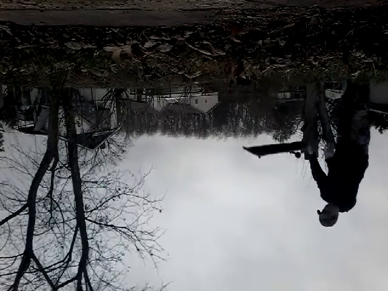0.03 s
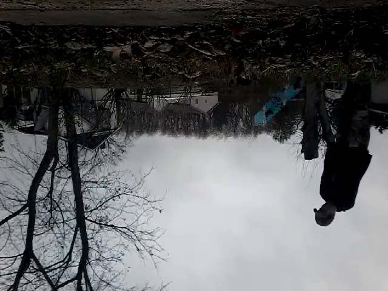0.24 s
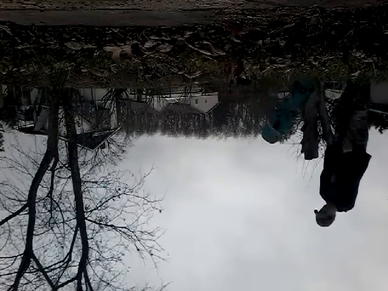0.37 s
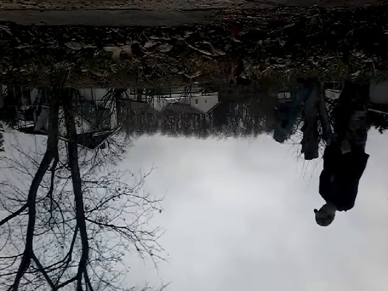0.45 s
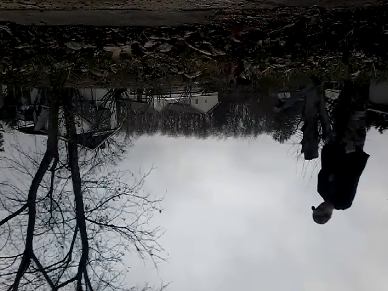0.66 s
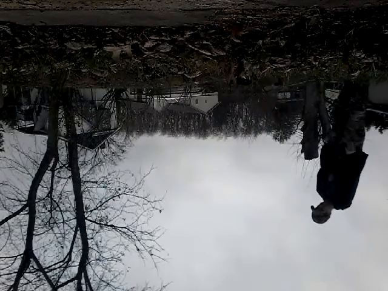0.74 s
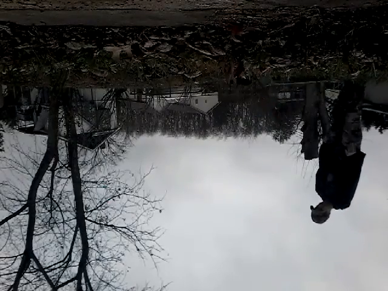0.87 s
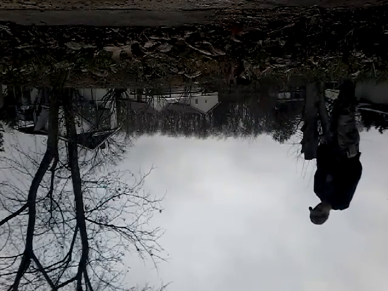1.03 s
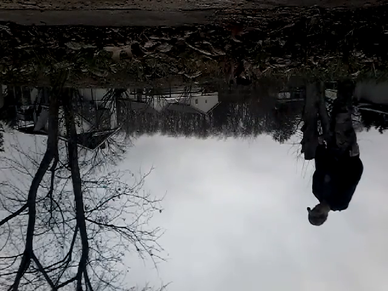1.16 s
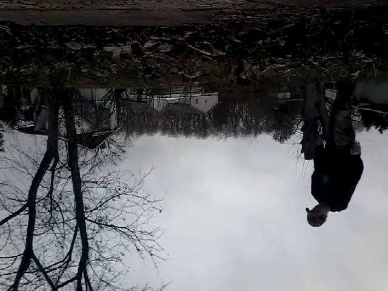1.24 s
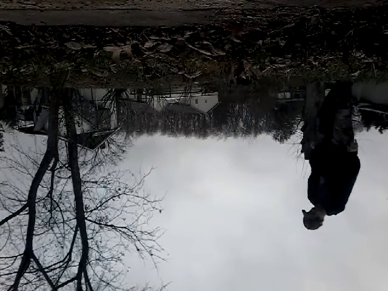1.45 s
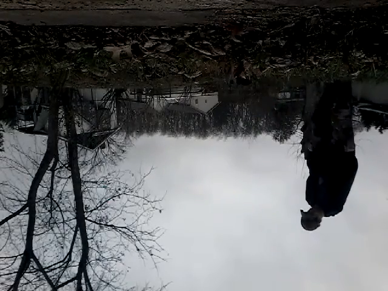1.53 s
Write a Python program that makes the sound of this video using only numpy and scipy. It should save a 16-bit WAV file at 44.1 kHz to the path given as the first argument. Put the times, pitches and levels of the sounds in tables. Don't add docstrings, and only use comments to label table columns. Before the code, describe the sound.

A thrown wooden skateboard slams the ground with two sharp cracks and metallic rattle, bounces, slams again, then knocks more softly to rest in an open yard with patchy echo, light wind and hiss.

```python
import sys
import numpy as np
from scipy import signal
from scipy.io import wavfile

SR = 44100
rng = np.random.default_rng(int(sys.argv[2]) if len(sys.argv) > 2 else 0)


def volts(x):
    e = np.asarray(x, float) / 20
    return 10 ** e


def wrap_up_sound(samples):
    columns = np.atleast_2d(samples).T
    tamed = np.clip(columns, -1, 1)
    steps = np.round(tamed * 32767).astype(np.int16)
    wavfile.write(sys.argv[1], SR, steps)


N = 70560
TIME_S = np.arange(N) / SR


def rms_one(x):
    return x / np.sqrt(np.mean(x ** 2) + 1e-20)


def click(start_s):
    return (np.arange(N) == int(start_s * SR)).astype(float)


def cut(x, hz, kind):
    return signal.sosfilt(signal.butter(2, hz, kind, fs=SR, output="sos"), x)


def ring(clicks, hz, t60_s):
    r = volts(-60 / (max(t60_s, 0.003) * SR))
    w = 2 * np.pi * hz / SR
    return signal.lfilter([0, np.sin(w)], [1, -2 * r * np.cos(w), r * r], clicks + 1e-18)


def grains(per_s, spread_db):
    hit = rng.random(N) < per_s / SR
    size_db = spread_db * np.minimum(rng.exponential(1, N), 3)
    return hit * volts(size_db) * rng.choice([-1, 1], N)


def drift(rate):
    r = np.exp(-80 * np.pi * rate / SR)
    slow = signal.lfilter([1], [1, -2 * r, r * r], rng.standard_normal(N // 40 + 2002))[2000:]
    return np.interp(np.arange(N) / 40, np.arange(len(slow)), rms_one(slow))


def noise(spectrum, patchy_db, rate):
    hz, db = np.transpose(spectrum)
    edges = 25 * 2 ** np.arange(0, 9.6, 0.5)
    white = rng.standard_normal((2, N))
    total = np.zeros(N)
    for k, (low, high) in enumerate(zip(edges, edges[1:])):
        band_db = np.interp(np.log(low * high) / 2, np.log(hz), db, -90, -90)
        total += volts(band_db + patchy_db * drift(rate)) * cut(white[k % 2], [low, high], "band")
    return rms_one(total)


# start_s, level_db (peak), pitch_hz, rattle_db (against the blow), t60_s (ring and chatter)
SLAMS = [(.2357, -9, 1038, -9.5, 0.075), (.2360, -3, 780, -31, .012), (0.2357, -12, 347, -34, 0.027),
         (.2410, -19.5, 656, -9, 0.058), (0.2352, -15, 346, -36, 0.15), (0.2343, -17.5, 265, -31, 0.18),
         (.2358, -12.5, 835, -36.5, 0.14), (.2433, -21, 627, -3.5, 0.045),
         (0.2449, -11, 1000, -10.5, 0.038), (.2550, -21.5, 400, -11, 0.023), (.2595, -14, 652, -11.5, 0.03),
         (0.26, -11.5, 960, -13, 0.034), (0.265, -15.5, 1056, -5, 0.1), (.2760, -24, 690, -9, .05),
         (.2850, -22.5, 756, -15, 0.045), (.2935, -19, 810, -16.5, 0.072), (.3166, -3, 622, -8, 0.029),
         (.3170, -5, 886, -14, 0.024), (.3225, -15, 801, -12, 0.06), (.3298, -16, 687, -13, 0.036),
         (0.3368, -12, 422, -7.5, 0.029), (.3360, -17, 1096, -7, 0.03), (.3445, -20, 580, -5, 0.11),
         (0.354, -17.5, 500, -17.5, .05), (.3600, -17.5, 420, -19, 0.078), (.3800, -26.5, 589, -5, .1),
         (.4100, -14, 317, -10, 0.018), (0.9111, -12, 985, -15, 0.062), (.9109, -11, 685, -32, 0.0096),
         (0.9106, -12, 458.7, -23, 0.091), (0.9103, -10, 256.5, -28, 0.072),
         (.9108, -14.5, 864, -38, 0.073), (.9180, -16.5, 735, -13, 0.047), (0.909, -34, 1365, -39.5, 0.054),
         (.9110, -12.5, 174, -46.5, 0.062), (.9250, -22.5, 893, -13.5, 0.075),
         (.9350, -30.5, 696, -11, 0.096)]
KNOCKS = [(0.6052, -27.5, 413, -35.5, 0.26), (.6056, -19.5, 630, -36, 0.014),
          (0.607, -27.5, 162, -11.5, 0.13), (.6108, -36, 730, -16.5, 0.043), (0.618, -31, 278, -15, 0.055),
          (.6120, -37, 1203, -36, 0.045), (.6225, -28, 820, -20, .03), (.6320, -34, 692, -16, 0.05),
          (.6440, -34.5, 575, -12.5, .05), (0.8539, -18.5, 220.6, -30.5, 0.021),
          (.8545, -30, 690, -10.5, 0.061), (0.856, -32.5, 1143, -34, .06), (.8600, -30, 616, -20, 0.026),
          (0.871, -28, 400, -13, 0.039), (.8795, -29, 800, -17, .03), (.9745, -44.5, 1740, 3, 0.092),
          (.9880, -50, 218, -17, 0.052), (1.003, -44, 1460, -7, 0.061), (1.022, -46, 258, -25, 0.085),
          (1.028, -44.5, 1124, -3, 0.084), (1.031, -48, 1710, -14, 0.086),
          (1.120, -37.5, 593, -12.5, 0.069), (1.130, -41, 404, -8, 0.068), (1.124, -46.5, 1120, -33, 0.091),
          (1.1562, -23.5, 288, -18, 0.056), (1.1565, -26.5, 704.4, -10.5, 0.17),
          (1.1636, -19, 715, -15, 0.04), (1.156, -31.5, 1052, -18, 0.041), (1.16, -36.5, 1224, -33, 0.096),
          (1.2000, -36, 194, -14.5, 0.1), (1.2300, -41, 897, -11, 0.064),
          (1.2648, -28.5, 230, -12.5, 0.053), (1.266, -29.5, 743, -14.5, 0.16),
          (1.2715, -28.5, 711, -19.5, 0.077), (1.317, -31.5, 220, -14.5, 0.033),
          (1.319, -35, 1196, -16, 0.031), (1.330, -34.5, 708, -15, 0.1), (1.446, -48.5, 801, -17.5, 0.024),
          (1.476, -41, 767, -12, 0.018)]
START_S, LEVEL_DB, PITCH_HZ, RATTLE_DB, RING_S = np.vstack([SLAMS, KNOCKS]).T


def shaking():
    rise_s = 0.00098
    age_s = np.maximum(TIME_S - START_S[:, None], 0)
    t60_s = np.clip(RING_S, 0.005, 1)[:, None]
    return (1 - np.exp(-age_s / rise_s)) * volts(-60 * age_s / t60_s)


def strikes():
    contact_cycles, crack_cycles, crack_db, crack_from_hz = 2.47, 1.5, -5.5, 500
    out = np.zeros(N)
    for start_s, level_db, hz, ring_s in zip(START_S, LEVEL_DB, PITCH_HZ, RING_S):
        blow = volts(level_db) * click(start_s)
        struck = ring(blow, hz, 0.63 * ring_s)
        if hz > crack_from_hz:
            struck = struck + volts(crack_db) * ring(blow, hz, crack_cycles / hz)
        soft = np.gradient(ring(struck, hz, contact_cycles / hz))
        out += soft * np.log(1e6) / (2 * np.pi * contact_cycles)
    return out


# pitch_hz, level_db, t60_s
WOOD_MODES = [(265, -4, 0.14), (339, -1.5, 0.031), (410, -4, 0.027), (470, -11, 0.04), (632, 1, 0.025),
              (674, 0, 0.025), (735, -10.5, 0.034), (835, 0.5, 0.023), (935, -5.5, 0.02), (990, 0, 0.023),
              (1182, -8.5, 0.18), (1260, -21, 0.019), (1395, -9.5, .05), (1580, -15, .04)]


def chatter(shake):
    patter = grains(1400, 3.0) * volts(-13.5)
    out = np.zeros(N)
    for hz, mode_db, t60_s in WOOD_MODES:
        octaves_off = np.log2(hz / PITCH_HZ)
        gain = volts(-9.5 + LEVEL_DB + mode_db - 4 * octaves_off ** 2)
        out += ring(patter * (gain @ shake) * rng.normal(0, 1, N), hz, min(t60_s, 0.07))
    return cut(out, 235, "high")


# pitch_hz, level_db, t60_s
HARDWARE = [(1664, 7, 0.0033), (2040, 3, 0.0029), (2313, 3, 0.0046), (2960, -2.5, 0.0044),
            (3530, 6, 0.0055), (4080, -2, 0.0091), (4330, 2.5, 0.0034), (4740, 0.5, 0.0084),
            (5170, 1.5, 0.0044), (6330, -2, 0.0023)]


def rattle(shake):
    drive = volts(LEVEL_DB + RATTLE_DB + 2) @ shake
    out = volts(-15.5) * drive * cut(rng.standard_normal(N), 7200, "high")
    for hz, mode_db, t60_s in HARDWARE:
        out += volts(mode_db - 20) * ring(grains(2500, 2.5) * drive, hz, min(t60_s, 0.012))
    return out


def thuds():
    hz = 98.4
    push = np.zeros(N)
    push[(START_S * SR).astype(int)] = volts(LEVEL_DB - 46)
    return ring(ring(push, hz, 0.27), hz, 0.018) * hz / SR * 20


def board():
    shake = shaking()
    wood = cut(chatter(shake) + strikes(), 1940, "low")
    return cut(wood, 140, "high") + rattle(shake) + thuds()


# start_s, level_db (peak), pitch_hz, t60_s
PINGS = [(0.238, -27, 4500, 0.017), (0.265, -19.5, 2470, 0.045), (0.3159, -12, 4400, 0.013),
         (0.3356, -22, 2360, .02), (0.336, -24, 2600, .015), (0.3425, -20, 2524, 0.023),
         (0.6062, -46, 3300, 0.019), (.6085, -42.5, 5340, .02), (.612, -39, 2270, .015),
         (.619, -41.5, 2250, 0.022), (0.63, -42, 5220, 0.014), (0.853, -49, 3600, 0.011),
         (0.858, -42, 4700, 0.044), (.856, -41, 4060, .02), (.8555, -40.5, 5600, .01),
         (0.913, -29, 4307, .05), (1.156, -37.5, 3330, 0.031), (1.1548, -37.5, 4700, 0.015)]


def pings():
    metal = sum(ring(volts(db) * click(start_s), hz, t60_s) for start_s, db, hz, t60_s in PINGS)
    return cut(metal, 1500, "high")


def thump():
    return cut(ring(volts(-46.5) * click(1), 54.8, 0.08), 300, "low")


# centre_hz, level_db, t60_s
YARD = [(143, -2.5, 0.98), (393, -1.5, 0.39), (1000, -12.5, 0.89), (1850, 2.5, 0.74), (4500, -6, 0.99),
        (9750, -2, 0.43)]
# delay_s, level_db (below 0 thins it), spread_s
WALLS = [(.03, 0, 0.003), (.075, 3, .015), (.12, 5.5, .02), (.16, -1.5, 0.023), (.24, -3.5, 0.046)]


def yard(x):
    rise_s, far_s, far_loss_db = 0.004, 0.096, -14
    t = np.arange(int(0.7 * SR)) / SR
    bunch_db = sum(db * np.exp(-0.5 * ((t - delay_s) / wide_s) ** 2) for delay_s, db, wide_s in WALLS)
    far_db = far_loss_db / (1 + np.exp((far_s - t) / 0.044))
    shape = (1 - np.exp(-t / rise_s)) * volts(bunch_db + far_db)
    smear_share = 0.78
    smear = rms_one(cut(rng.standard_normal(N), 120, "low"))
    blurred = x * (np.sqrt(1 - smear_share) + np.sqrt(smear_share) * smear)
    hz = np.array(YARD)[:, 0]
    edges = np.r_[80, np.sqrt(hz[1:] * hz[:-1]), 16000]
    answer = np.zeros(len(t))
    for k, (_, db, t60_s) in enumerate(YARD):
        band = cut(rng.standard_normal(len(t)), [edges[k], edges[k + 1]], "band")
        answer += volts(db - 60 * t / t60_s) * band
    return volts(-36.5) * signal.fftconvolve(cut(blurred, 170, "high"), answer * shape)[:N]


# time_s, level_db
SWISH = [(0.0, -58.5), (0.02, -62.5), (0.048, -62.5), (0.074, -53), (0.105, -71.5), (0.13, -78)]
# pitch_hz, level_db (per Hz)
SLEEVE = [(240, -11), (400, -7), (854, -11.5), (1400, -9), (2500, -23), (4600, -21), (9000, -26),
          (15000, -28)]
# time_s, level_db
BRUSH = [(.03, -86), (.055, -56), (.075, -45), (.092, -60), (.105, -80)]


def sleeve():
    swish = volts(np.interp(TIME_S, *np.transpose(SWISH), right=-99) + 9) * noise(SLEEVE, 7.0, 8.3)
    band = [3300, 6750]
    scrape = rms_one(cut(cut(rng.standard_normal(N), band, "band"), band, "band"))
    return swish + volts(np.interp(TIME_S, *np.transpose(BRUSH), left=-99, right=-99)) * scrape


# time_s, level_db
WIND = [(0, -42), (.11, -50.5), (.2, -56), (.3, -48.5), (.5, -47), (.58, -58.5), (.64, -47), (.72, -56),
        (.82, -56.5), (.95, -49), (1.08, -59), (1.2, -47.5), (1.33, -54), (1.6, -62.5)]
# pitch_hz, level_db (per Hz)
RUMBLE = [(25, -30.5), (50, -12), (70, 0.5), (125, 3.5), (170, -6.5), (250, -12), (400, -35)]


def wind():
    flutter = noise(RUMBLE, patchy_db=1.5, rate=12) * volts(drift(12))
    return volts(np.interp(TIME_S, *np.transpose(WIND)) - 2) * flutter


# pitch_hz, level_db (per Hz)
HUM = [(150, -1.5), (300, 5), (600, -3.5), (1000, -6), (1600, -16), (2500, -23.5)]


def far_hum():
    return volts(-59 - 5 * TIME_S) * noise(HUM, patchy_db=1.0, rate=9)


# pitch_hz, level_db (per Hz)
HISS = [(470, -44), (800, -13), (3850, -3), (5210, -3.5), (8870, 0.5), (15100, 2), (16500, -7)]


def hiss():
    return volts(-63.5 - 2 * TIME_S) * noise(HISS, patchy_db=1.0, rate=8)


def scene():
    hits = board()
    landing = hits + pings() + thump() + yard(hits)
    floor = wind() + far_hum() + hiss()
    return (landing + sleeve() + floor)[None]


def band_limit(x):
    return signal.sosfilt(signal.butter(12, 16830, fs=SR, output="sos"), x)


def record(dry):
    ceiling, top_hz = 1.6, 15600
    rounded = ceiling * np.tanh(dry / ceiling)
    low_pass = signal.cheby2(12, 60, top_hz * 1.04, fs=SR, output="sos")
    return band_limit(signal.sosfilt(low_pass, rounded))


dry = scene()
out = record(dry)
wrap_up_sound(out)
```